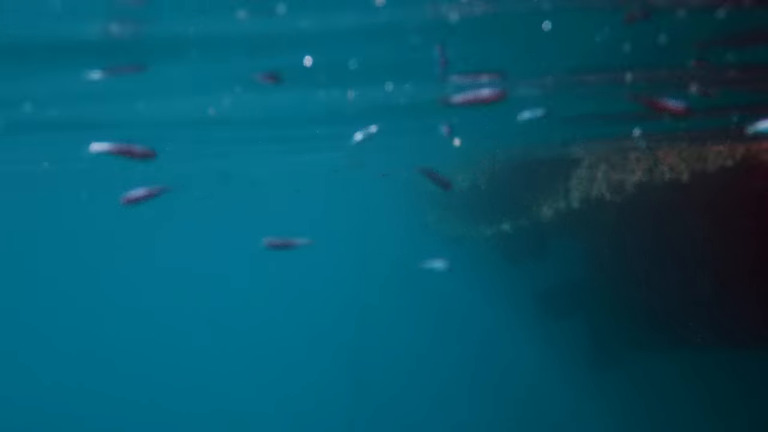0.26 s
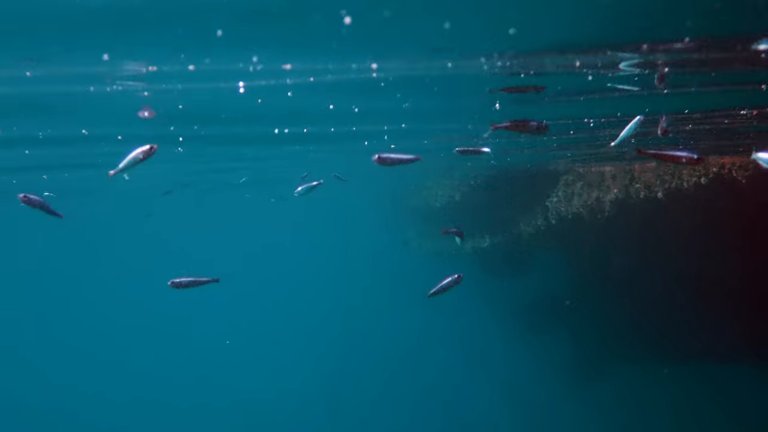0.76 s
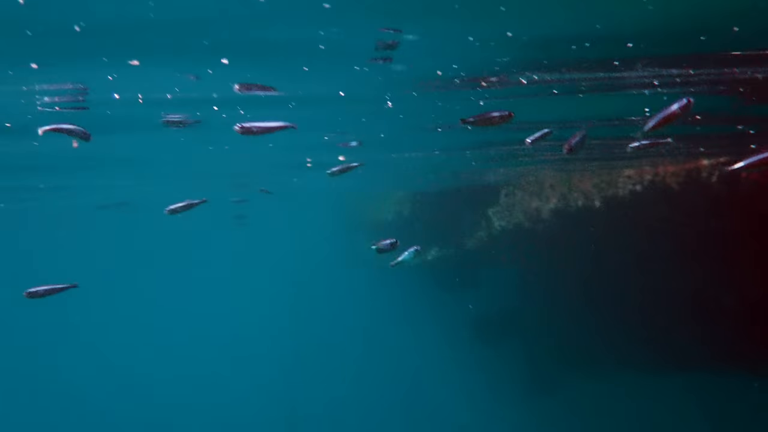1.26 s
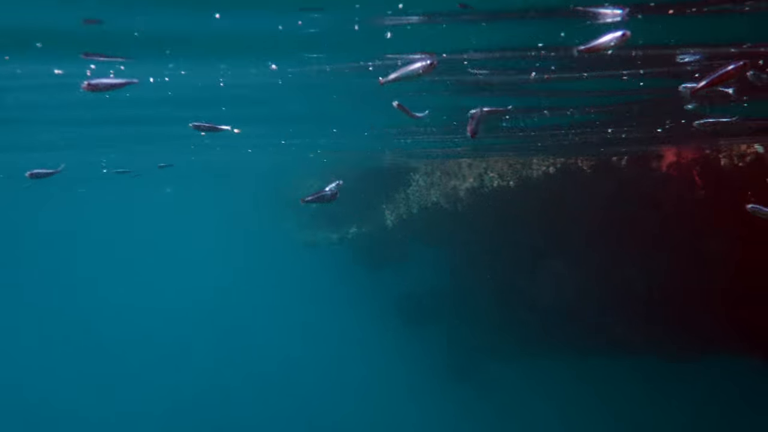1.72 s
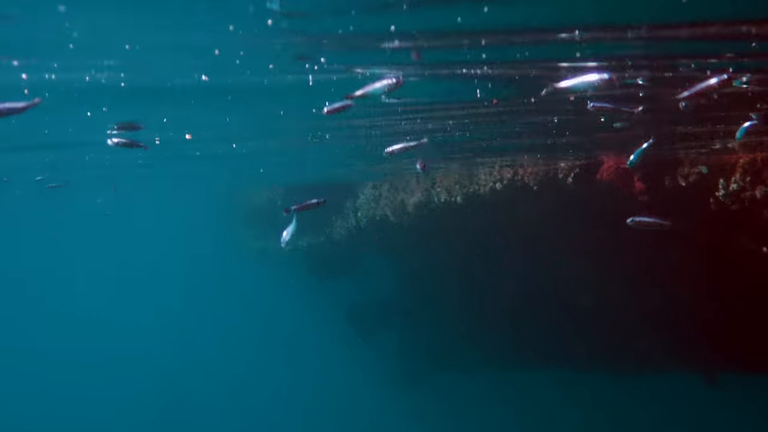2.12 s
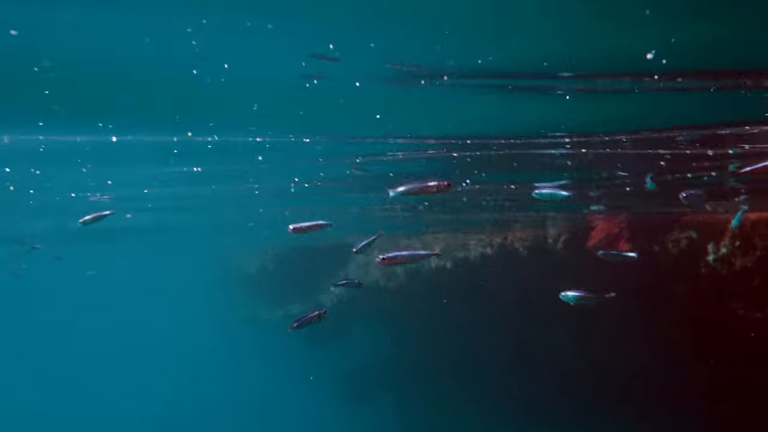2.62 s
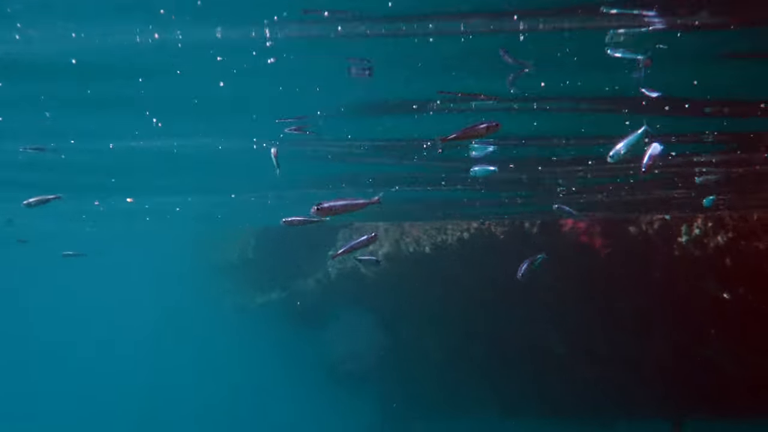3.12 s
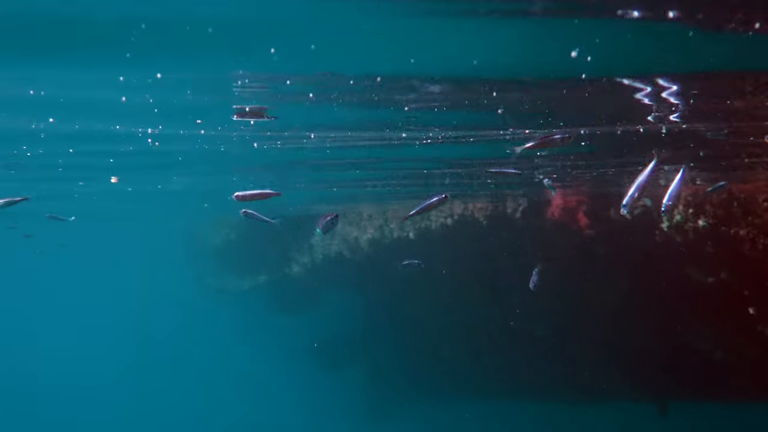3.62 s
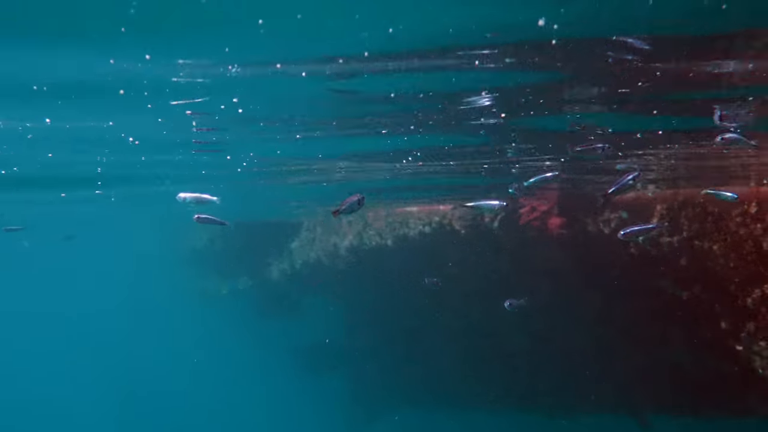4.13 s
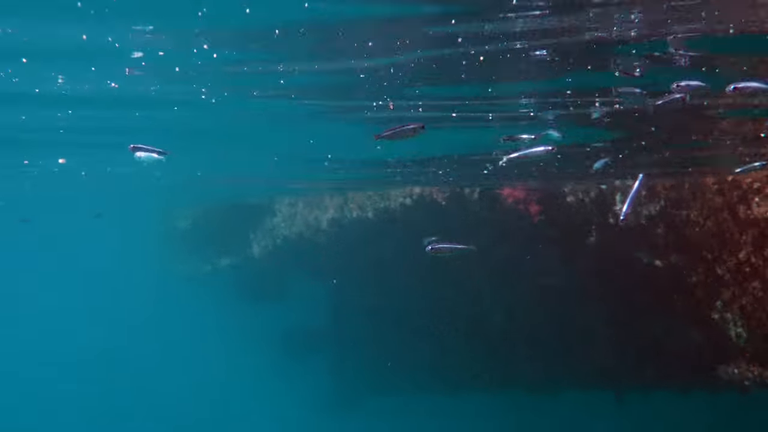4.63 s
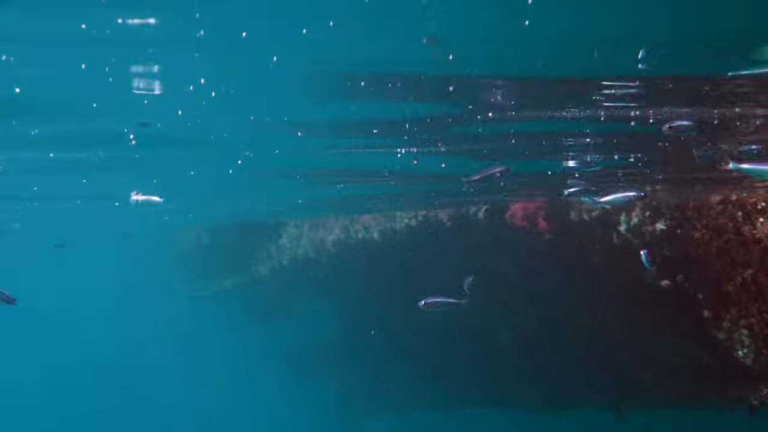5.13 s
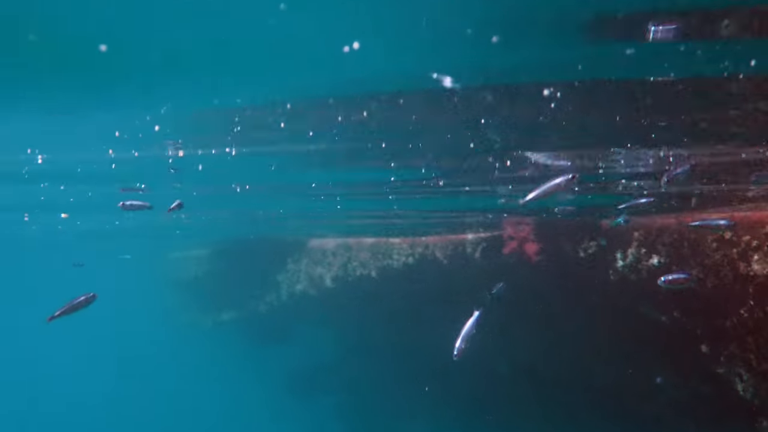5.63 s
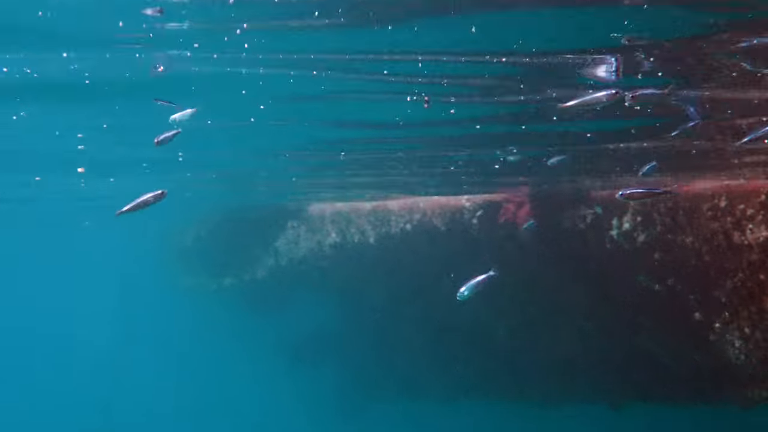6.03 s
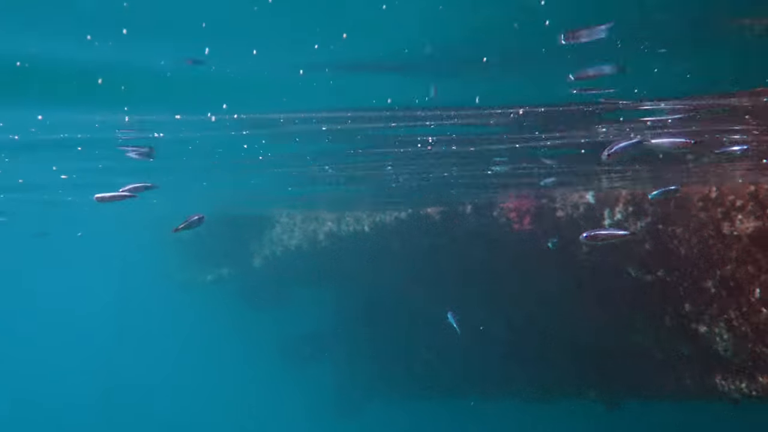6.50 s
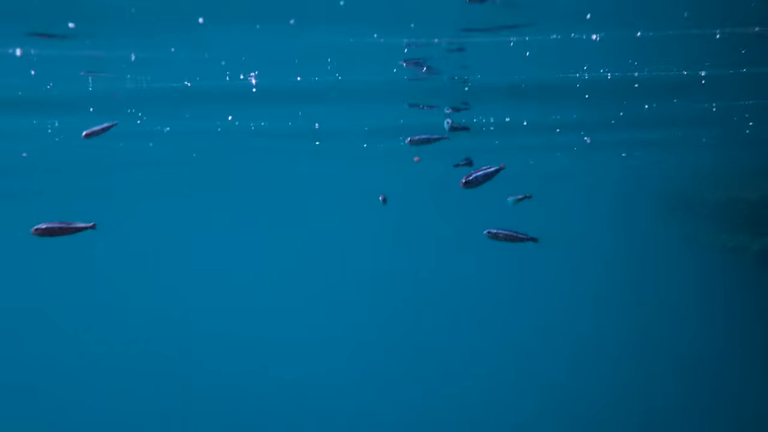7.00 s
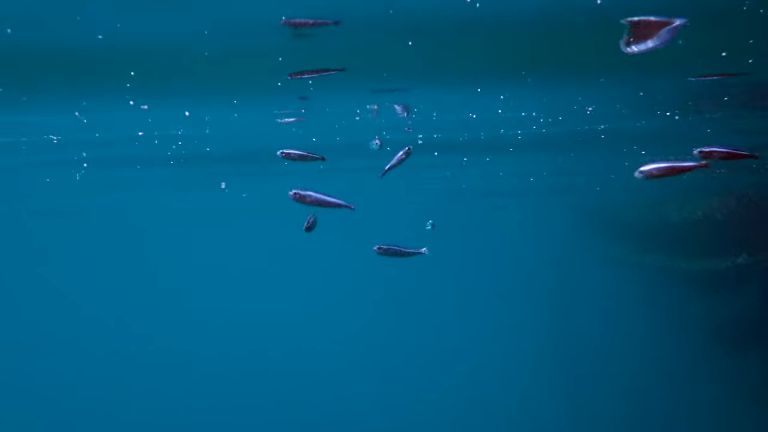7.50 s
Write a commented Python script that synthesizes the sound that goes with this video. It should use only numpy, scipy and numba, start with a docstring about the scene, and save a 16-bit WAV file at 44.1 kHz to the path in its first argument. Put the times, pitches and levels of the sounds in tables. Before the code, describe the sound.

Muffled water rumbles and surges around a camera in a watertight case, just below the surface of a shallow harbour. A hollow, lumpy wash and faint steady hiss lie over it. Shrimp snap throughout, a few sharp and close among many faint, distant clicks, with standout cracks near 0.8, 2.6 and 4.2 seconds.

From the start a small motor inside the case ticks and grinds about fifteen times a second, pausing briefly around 1 second. Faint wavering whines come within the first second. Soft round thumps patter on the case, and hard knocks land near 0.3, 1.5, 1.9 and 2.8 seconds.

At 3.2 seconds the motor stops and the wash sinks, leaving snaps, sparser bumps and low swells near 3.9 and 6.1 seconds. At 6.9 seconds the motor and wash return, with a few lighter knocks, until the end at about 7.7 seconds.

```python
"""A camera in a watertight case drifts under the surface of a shallow harbour. From the start water rumbles
over a hollow wash and microphone hiss, a small motor inside steps 15 times a second, the case thumps and
shrimp snap near and far. Brief whines, probably the lens motor, come in the first second; hard knocks land
near 0.3, 1.5, 1.9 and 2.8 s. At 3.2 s the motor rests and the wash sinks; at 6.9 s both come back.
Two microphones hear the case through air pockets of their own, and a limiter ducks the loudest hits."""
import sys
import numpy as np
from scipy import signal
from scipy.fft import rfft, irfft
from scipy.io import wavfile
from scipy.ndimage import uniform_filter1d
from numba import njit

SR = 44100
rng = np.random.default_rng(int(sys.argv[2]) if len(sys.argv) > 2 else 0)


def file_out(sig):
    """Save sig as 16-bit WAV at sys.argv[1]."""
    # one column per channel
    cols = np.atleast_2d(sig).T
    # limit, then scale
    lim = np.clip(cols, -1, 1)
    pcm = np.round(lim * 32767).astype(np.int16)
    wavfile.write(sys.argv[1], SR, pcm)


N = 341775
T, F = np.arange(N) / SR, np.arange(N // 2 + 1) * SR / N + 1e-3  # time in seconds, frequency in Hz


def undb(db):
    return 10 ** (np.asarray(db) / 20)


def coloured(spectrum, channels=1):
    """Noise of rms 1 with the given spectrum."""
    hz, db = np.transpose(spectrum)
    gain = undb(np.interp(np.log(F), np.log(hz), db))
    noise = irfft(rfft(rng.standard_normal((channels, N))) * gain, N)
    return noise / np.sqrt(np.mean(noise ** 2))


def ring(x, modes, soft_hz):
    """Resonances struck by a contact too soft for much above soft_hz; a unit click peaks at 1."""
    body = sum(undb(db) * 1j * F * width / (hz ** 2 - F ** 2 + 1j * F * width) for hz, width, db in modes)
    response = body / (1 + 1j * F / soft_hz) ** 2
    return irfft(rfft(x) * response, N) / np.abs(irfft(response, N)).max()


def walk(rate):
    """A glide through rate random values a second; spread near 1."""
    hold = int(SR / rate)
    return uniform_filter1d(np.repeat(rng.standard_normal(N // hold + 1), hold), hold)[:N]


def add(out, s, x):
    """Mix x in at s seconds."""
    i = int(s * SR)
    out[..., i:i + x.shape[-1]] += x[..., :N - i]


def burst(click, rattle_db, decay_s, channels=1):
    """A click followed by a fading rattle of noise."""
    t = T[:SR // 10]
    x = undb(rattle_db) * rng.standard_normal((channels, len(t))) * np.exp(-t / decay_s)
    x[:, 0] += click
    return x


# Level of the rumble and of a hollow, lumpy wash that is louder while the motor runs.
# Each row: time in seconds, rumble level in dB, wash level in dB.
BED_LEVELS = [(0, -48, -47), (.5, -48, -47.5), (.8, -38.5, -44), (.95, -46, -49), (1.3, -40.5, -44.5),
              (1.8, -44.5, -47.5), (2.2, -41.5, -44), (2.5, -49.5, -49), (2.8, -43.5, -45),
              (3.3, -46, -49.5), (4.0, -49, -51.5), (4.6, -44, -53), (5.1, -46.5, -52.5), (5.9, -47, -53.5),
              (6.3, -42.5, -52), (6.85, -47, -55), (6.97, -49.5, -43), (7.75, -46, -47)]
# Surges riding on the rumble. Each row: middle in seconds, level change in dB.
SURGES = [(.04, 7.5), (.13, 13), (.41, 10.5), (.6, 2), (.73, 4), (1.19, 5), (1.51, 8), (1.7, 10), (2.5, 5),
          (2.66, 11), (2.78, 6), (3.06, 11), (3.54, 5.5), (3.93, 15), (4.12, 9), (4.36, 8), (5.07, 1),
          (5.5, 4.5), (6.13, 11), (6.62, -2.5), (6.97, 6.5), (7.53, 0), (7.66, 3.5)]
# The deep colour of the rumble. Each row: frequency in Hz, relative level in dB.
RUMBLE_COLOUR = [(20, -4.5), (30, 22), (40, 20.5), (80, 18), (120, 12.5), (160, -1), (250, -54.5)]
# The hollow colour of the wash. Each row: frequency in Hz, relative level in dB.
WASH_COLOUR = [(120, -21), (170, -6.5), (250, -3), (310, 0), (400, -4.5), (450, -7.5), (520, -13.5),
               (650, -22.5), (800, -34.5), (1600, -41.5), (2500, -80)]


def rumble_and_wash(surge_width_s=0.063):
    """Moving water rumbles, surging now and then; above it a hollow wash comes in quick uneven lumps."""
    s, rumble_db, wash_db = np.transpose(BED_LEVELS)
    surge_db = sum(db * np.exp(-np.log(16) * ((T - mid) / surge_width_s) ** 2) for mid, db in SURGES)
    rumble = coloured(RUMBLE_COLOUR) * undb(np.interp(T, s, rumble_db) + surge_db + 0.85 * walk(11))
    wash = coloured(WASH_COLOUR) * undb(np.interp(T, s, wash_db) + 3.96 * walk(40))
    return rumble + wash


def eddies():
    """Flow at each microphone port adds a faint rumble, unrelated left and right."""
    return coloured(RUMBLE_COLOUR, channels=2) * undb(-55)


# The colour of the microphones' noise floor. Each row: frequency in Hz, relative level in dB.
HISS_COLOUR = [(530, -13.5), (900, -0.5), (1170, -7.5), (1610, -8), (1930, -12.5), (3460, -16.5),
               (3990, -24), (4280, -22), (5910, -9.5), (6730, -9), (7590, -4), (8440, -6.5), (9400, -16.5),
               (10200, -12.5), (15500, -14.5)]


def hiss(level_db=-67.5):
    """Each microphone's own steady noise, a touch louder on the left."""
    return coloured(HISS_COLOUR, channels=2) * undb(level_db + np.array([[.8], [-.8]]))


# When the motor runs. Each row: start in seconds, end in seconds.
MOTOR_RUNS = [(.0165, .09), (.2167, 1.02), (1.218, 3.23), (6.9228, 7.73)]
# How hard it steps. Each row: time in seconds, kick level in dB.
MOTOR_LEVELS = [(0, -35.5), (.3, -41.5), (.5, -43), (.62, -43), (.75, -37.5), (1.0, -43), (1.3, -43.5),
                (1.42, -42), (1.55, -49.5), (1.7, -44), (2.0, -45), (2.3, -41.5), (2.55, -40), (2.8, -40),
                (2.95, -46), (3.2, -39), (6.92, -43), (7.0, -35), (7.13, -38), (7.33, -40), (7.39, -40.5),
                (7.46, -38.5), (7.53, -42), (7.59, -40), (7.66, -43), (7.73, -37)]
# The resonances that colour its grind. Each row: pitch in Hz, width in Hz, gain in dB.
MOTOR_MODES = [(526, 25, -14), (602, 23.3, 19.5), (658, 67, 21), (1000, 120, 0.5), (1700, 73, 7)]


def motor(step_s=.06674, scatter_db=2.1, grind_drive_db=-30.5):
    """Each step is a sudden kick that falls in pitch, and about 30 ms of grinding as the part travels."""
    kicks, grind, t = np.zeros(N), np.zeros(N), T[:SR // 15]
    travel = np.clip(t / 0.0014, 0, 1) * np.exp(-t / 0.074) / (1 + np.exp((t - .034) / 0.0014))
    kick = (1 - np.exp(-(t / 0.0022) ** 2)) * np.exp(-(t / 0.011) ** 2)
    steps = np.concatenate([np.arange(start, end, step_s) for start, end in MOTOR_RUNS])
    for s, (detune, shift, force) in zip(steps, rng.standard_normal((len(steps), 3))):
        db = np.interp(s, *np.transpose(MOTOR_LEVELS)) + scatter_db * force
        phase = 2 * np.pi * ((710 + 8 * detune) * t - 5000 * t ** 2) + .5 * shift
        add(kicks, s, undb(db) * kick * np.sin(phase))
        add(grind, s, undb(db + grind_drive_db) * travel * rng.standard_normal(len(t)))
    return kicks + ring(grind, MOTOR_MODES, soft_hz=780)


# Round thumps on the case.
# Each row: middle in seconds, level in dB, pitch in Hz, length at half height in milliseconds.
THUMPS = [(.022, -28.5, 293, 8.5), (0.123, -29, 260, 9.1), (0.138, -29.5, 253, 7), (.165, -34, 265, 12),
          (0.215, -24.5, 320, 4.1), (.23, -30.5, 250, 16), (0.251, -30, 250, 8.5),
          (0.333, -19.5, 392, 14.5), (0.351, -17.5, 380, 5.7), (.406, -31, 280, 7.6), (.724, -30, 262, 8.3),
          (0.747, -27, 265, 8.3), (0.764, -26, 271, 7), (.786, -27, 270, 8.8), (.799, -30, 232, 23),
          (.823, -26, 267, 9.6), (1.036, -26.5, 287, 9.9), (1.059, -30.5, 249, 17), (1.073, -26, 264, 6.7),
          (1.174, -29.5, 283, 8.2), (1.213, -29, 252, 6.8), (1.225, -33, 292, 13), (1.358, -29.5, 312, 7),
          (1.372, -32, 307, 5.3), (1.441, -24, 263, 16), (1.467, -12.5, 277, 4), (1.484, -26.5, 296, 19),
          (1.536, -29, 257, 6.9), (1.65, -27, 271, 10.3), (1.678, -30.5, 288, 19), (1.688, -32, 239, 11),
          (1.746, -31, 278, 9.4), (1.829, -28, 231, 13), (1.842, -25.5, 260, 5), (1.892, -30, 323, 8.7),
          (2.092, -26, 284, 5.4), (2.114, -28.5, 257, 9.4), (2.138, -30.5, 266, 6.3),
          (2.156, -35, 262, 7.9), (2.176, -27.5, 251, 7.8), (2.191, -33, 265, 11), (2.206, -30, 265, 12.4),
          (2.27, -32, 274, 7.5), (2.29, -29.5, 254, 7.4), (2.569, -28, 343, 7.5), (2.748, -29, 338, 5.1),
          (2.831, -32, 362, 13.6), (2.936, -29.5, 336, 11), (3.057, -24, 259, 13.5), (3.075, -25, 266, 3.1),
          (3.11, -25, 251, 13), (3.582, -31, 280, 6.7), (3.66, -36, 363, 11), (3.899, -32.5, 261, 6),
          (3.999, -32.5, 308, 6.5), (4.102, -31.5, 255, 9.4), (4.445, -27.5, 342, 8.8),
          (5.259, -33.5, 330, 7.6), (6.117, -22, 267, 11.8), (6.134, -36, 263, 8.4),
          (6.232, -32.5, 254, 5.8), (7.196, -31.5, 326, 10), (7.38, -32, 364, 10)]


def thumps(patter_count=50, lead_s=0.05):
    """Each push of water swings the wall for a few cycles, with a deep shove beneath."""
    out, t = np.zeros(N), T[:SR // 10] - lead_s
    # a patter of small thumps rides 5 to 12 dB above the wash
    when, force, pitch, length = rng.random((patter_count, 4)).T
    bed_s, _, wash_db = np.transpose(BED_LEVELS)
    patter_s = when * N / SR
    patter_db = np.interp(patter_s, bed_s, wash_db) + 5 + 7 * force
    patter = np.c_[patter_s, patter_db, 238 + 125 * pitch, 5.1 + 10.8 * length]
    for s, db, hz, ms in [*THUMPS, *patter]:
        shove_pitch, phase = rng.random(2)
        envelope = np.exp(-np.log(16) * (t / (ms / 1000)) ** 2)
        shove = 0.34 * np.sin(2 * np.pi * (80 + 50 * shove_pitch) * t)
        thump = undb(db) * envelope * (np.sin(2 * np.pi * (hz * t + phase)) + shove)
        early = max(int((lead_s - s) * SR), 0)
        add(out, max(s - lead_s, 0), thump[early:])
    return out


def echoes(draws, level_db=-13.5, spread_s=0.057, fade_s=0.031):
    """Scattered returns from rocks and surface; each row of draws sets a delay and a strength."""
    delay_s = spread_s * draws[:, 0] ** 2 + 0.0035
    out = np.zeros(SR // 10)
    out[(delay_s * SR).astype(int)] = undb(level_db) * (2 * draws[:, 1] - 1) * np.exp(-delay_s / fade_s)
    return out


def focus(x, hz, q):
    """Two passes through a band-pass gather the sound round one pitch."""
    band = signal.iirpeak(hz, q, SR)
    return signal.lfilter(*band, signal.lfilter(*band, x))


# Foreground shrimp snaps. Each row: start in seconds, dull drive in dB, bright drive in dB,
# bright part's left minus right in dB, dull pitch in Hz, rattle decay in milliseconds.
SNAPS = [(.0518, -44.5, -67, 10, 1500, 4), (.083, -41, -39.5, 4, 1420, 6.3),
         (.199, -47, -41.5, 9.5, 1210, 8.6), (.3226, -37, -53, 4, 1180, 21),
         (.4286, -44.5, -53, 7, 1530, 6.6), (.4542, -48, -48, 11, 1670, 4.1),
         (.4635, -42.5, -43, 9.5, 1710, 4), (.7934, -26.5, -20, 1.5, 2220, 2.3),
         (.8897, -46.5, -40.5, 4.5, 1430, 6), (.976, -52.5, -52, 11, 1900, 4.3),
         (1.1909, -53, -47, 9.5, 1640, 26), (1.2865, -45, -42, 5, 1660, 6.3),
         (1.4443, -33, -53, -5, 1370, 2), (1.4653, -34, -41.5, -8, 1200, 6.2),
         (1.5472, -55, -45, 12, 1200, 7), (1.644, -54, -46.5, 12.5, 1210, 6),
         (1.8797, -50, -55, 4.5, 1220, 4.6), (2.175, -47, -47, 4, 1320, 7.5),
         (2.5872, -39.5, -22, 6.5, 1310, 6.6), (2.6117, -62, -47, 8, 1270, 6),
         (2.828, -23, -42.5, 9, 1100, 11.7), (2.8682, -37, -55, 3.5, 1230, 4.8),
         (3.0066, -50, -43.5, 3, 1680, 9), (3.2155, -42, -47, 5, 1640, 2.3), (3.3159, -62, -45, 6, 1400, 6),
         (3.356, -54, -39, 7, 1450, 9.1), (3.3615, -60, -36, 6.5, 1450, 8),
         (3.457, -53, -41.5, 7, 1490, 8.7), (3.7605, -37.5, -62, 5, 1430, 2.4),
         (3.7665, -37, -62, 3, 1440, 7.3), (3.819, -49, -66, 6, 1490, 7),
         (3.9775, -54, -37.5, 8.5, 1400, 7), (4.013, -43.5, -51, 7, 1450, 9),
         (4.1578, -37.5, -22.5, 8.5, 1330, 3.3), (4.3323, -34.5, -54, 11, 1500, 8.5),
         (4.4538, -72, -47, 10.5, 1200, 6), (4.5215, -63, -45, 8, 1330, 5),
         (4.958, -40.5, -34, 10.5, 1430, 2.5), (4.9862, -51, -37, 2, 1400, 8.7),
         (5.154, -47, -48, 6, 2000, 4.7), (5.1625, -47.5, -38, 6, 1250, 5.5),
         (5.223, -30, -49, 14, 1700, 2), (5.3874, -47.5, -44, 7, 1430, 5.8),
         (5.858, -50.5, -60, 3, 1780, 9), (5.89, -44, -42, 0, 1450, 6.7), (5.93, -54.5, -51, 3, 2200, 5),
         (6.1024, -57, -45.5, 10, 1440, 6), (6.1436, -45, -42.5, 13, 1990, 6.1),
         (6.2575, -44, -60, 4, 1510, 3.8), (6.2612, -35, -35, 3, 1340, 11), (6.31, -51, -60, 4, 2000, 11),
         (6.5987, -48.5, -31, 8, 1510, 8.7), (6.8821, -40.5, -37, -1, 1440, 2.6),
         (6.9265, -49, -45, 10, 1500, 6), (6.9385, -30.5, -29.5, 6.5, 1650, 4.7),
         (7.0574, -53, -37, 3, 1710, 4.5), (7.3667, -24, -35.5, 4.5, 1630, 3.3),
         (7.385, -51, -44, 6, 2540, 8), (7.5462, -68, -50, 14, 1650, 5.5)]
# The wall's dull ring under a snap. Each row: pitch in Hz, width in Hz, gain in dB.
DULL_MODES = [(710, 200, 32), (1020, 600, 23.5), (1406, 230, 16.5), (1590, 150, 13), (2570, 910, 21.5),
              (2860, 930, -20)]
# The bright ring of the crack. Each row: pitch in Hz, width in Hz, gain in dB.
BRIGHT_MODES = [(4840, 500, -27), (5140, 290, -5), (6940, 1120, 13), (7750, 390, 14), (11000, 5000, -72)]


def shrimp(far_count=700, far_db=-62, near_db=-17, distance_span_db=23.5, crack_hz=6640):
    """Near snaps and a crowd of faint far ones, each a dull blow on the wall and a bright crack."""
    when, size, softness, side, pitch = rng.random((far_count, 5)).T
    size_db = far_db + 13 * size ** 4
    far = np.c_[when * N / SR, size_db - 1.5 - 20 * softness, size_db,
                8 * side, 1000 + 1500 * pitch, np.full(far_count, 6.)]
    dull, bright = np.zeros((1, N)), np.zeros((2, N))
    for s, dull_db, bright_db, pan_db, hz, ms in [*SNAPS, *far]:
        draws = rng.random((6, 3))
        returns = echoes(draws)
        # where the wall is struck favours the modes near one pitch; grit trails after the blow
        blow = burst(0.18, -12.5, ms / 1000) + burst(0, -39, 0.031) + returns
        add(dull, s, undb(dull_db) * focus(blow, hz, q=1.37))
        # weaker snaps are farther: smeared, coloured, duller
        away = np.clip((near_db - bright_db) / distance_span_db, 0, 1)
        attack = burst(0.74 - 0.5 * away, -13.5, 0.00046 + 0.0011 * away)
        crack = attack + burst(0, -34, 0.0059, channels=2) + returns
        tint_hz = crack_hz + 2300 * away * (2 * draws[0, 2] - 1)
        crack = focus(crack, tint_hz, q=1.22) + undb(-1.5 - 2.5 * away) * crack
        add(bright, s + 0.001, undb(bright_db + np.array([[pan_db], [-pan_db]]) / 2) * crack)
    bright[1] = np.roll(bright[1], 3)  # reaches the right side half a cycle late
    return ring(dull, DULL_MODES, soft_hz=3560), ring(bright, BRIGHT_MODES, soft_hz=8800)


# Brief whines. Each row: start in seconds, end in seconds, pitch in Hz, rms level in dB.
WHINES = [(.19, .31, 500, -55), (.225, .31, 665, -50), (.375, .62, 500, -53), (.62, .8, 495, -58)]


def whines(fade_in_s=0.037, fade_out_s=0.051):
    """Brief wavering whines near 500 and 665 Hz, probably from the lens motor."""
    out = np.zeros(N)
    for start, end, hz, db in WHINES:
        gate = np.clip((T - start) / fade_in_s, 0, 1) * np.clip((end - T) / fade_out_s, 0, 1)
        level = np.sqrt(2) * undb(db + 0.78 * walk(28))
        phase = 2 * np.pi * np.cumsum(hz + 6 * walk(32.2)) / SR
        out += gate * level * np.sin(phase)
    return out


# Hard knocks on the case. Each row: start in seconds, level in dB, pitch in Hz, decay in milliseconds.
KNOCKS = [(.207, -28.5, 632, 7.2), (.326, -23, 523, 14.5), (.348, -20, 694, 11.9), (1.466, -24, 546, 6.5),
          (1.881, -22.5, 520, 4.2), (2.827, -25, 495, 8), (2.867, -40, 550, 7.1), (4.436, -44, 552, 6.1),
          (6.055, -36.5, 496, 3.7), (6.553, -44, 465, 29), (6.773, -45, 493, 11.5), (7.194, -28.5, 654, 4),
          (7.448, -34.5, 536, 8), (7.493, -35, 500, 14)]


def knocks():
    """A sharp swing of the wall with an overtone that dies sooner."""
    out, t = np.zeros(N), T[:SR // 10]
    for s, db, hz, ms in KNOCKS:
        envelope = (1 - np.exp(-t / 0.00069)) * np.exp(-(t / (ms / 1000)) ** 2)
        overtone = 0.12 * np.exp(-t / 0.014) * np.sin(2 * np.pi * 1.33 * hz * t)
        add(out, s, undb(db) * envelope * (np.sin(2 * np.pi * hz * t) + overtone))
    return out


# The air pocket behind each microphone, left then right.
# Each row: dip in Hz, dip width in Hz, peak in Hz, peak width in Hz, gain in dB.
AIR_POCKETS = [(386.2, 50, 485.4, 90.6, -3), (419, 123, 399, 71.7, -1.56)]


def air_pockets(x):
    """Each pocket dips and peaks at its own pitch, so the sides part in level and phase near 450 Hz."""
    sides = []
    for dip_hz, dip_width, peak_hz, peak_width, db in AIR_POCKETS:
        dip = dip_hz ** 2 - F ** 2 + 1j * F * dip_width
        peak = 1 / (peak_hz ** 2 - F ** 2 + 1j * F * peak_width)
        sides.append(undb(db) * (peak_hz / dip_hz) ** 2 * dip * peak)
    return irfft(rfft(x) * np.array(sides), N)


@njit
def limiter(x, threshold, depth, attack_s, release_s):
    """Ducks both sides together: quick to turn down, slow to come back."""
    out, envelope = np.empty_like(x), 0.
    for i in range(x.shape[1]):
        peak = max(abs(x[0, i]), abs(x[1, i]))
        envelope += (peak - envelope) / (SR * (attack_s if peak > envelope else release_s))
        out[:, i] = x[:, i] * min(1., threshold / (envelope + 1e-9)) ** depth
    return out


def scene():
    """Cracks, eddies and hiss go straight to the mix; all else passes through the air pockets."""
    dull_snaps, bright_cracks = shrimp()
    through_case = rumble_and_wash() + thumps() + knocks() + motor() + whines() + dull_snaps
    return air_pockets(through_case) + bright_cracks + eddies() + hiss()


def record(dry):
    """Roll off the deepest bass, duck the loudest hits, then cut the very top."""
    bass_cut = signal.butter(2, 30.5, "high", fs=SR, output="sos")
    top_cut = signal.ellip(10, .2, 60, 15800, fs=SR, output="sos")
    held = limiter(signal.sosfilt(bass_cut, dry), undb(-24.5), depth=0.79, attack_s=0.0027, release_s=.07)
    return signal.sosfilt(top_cut, held)


dry = scene()
out = record(dry)
file_out(out)
```